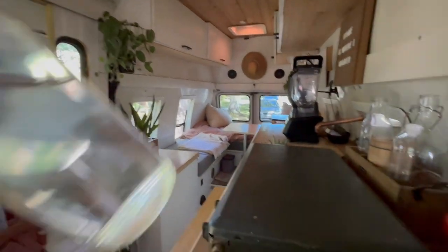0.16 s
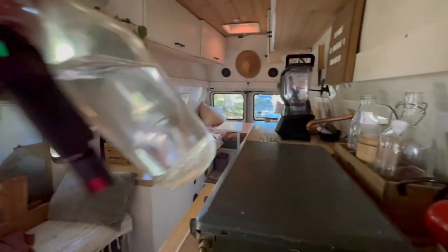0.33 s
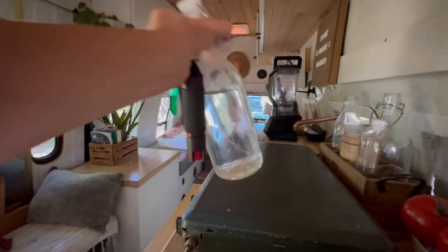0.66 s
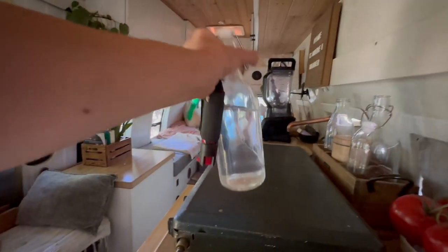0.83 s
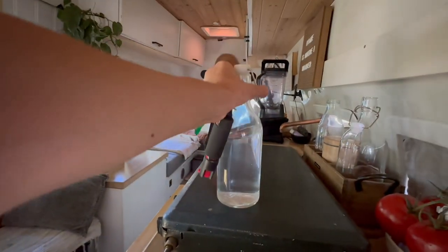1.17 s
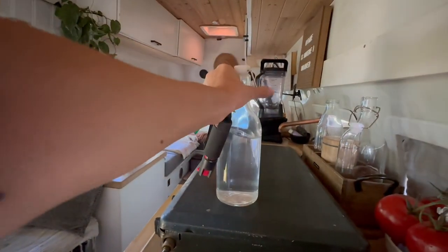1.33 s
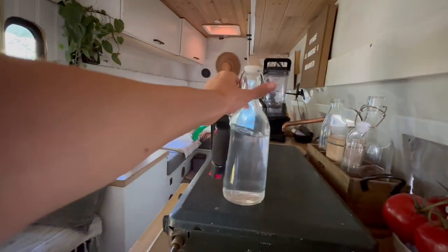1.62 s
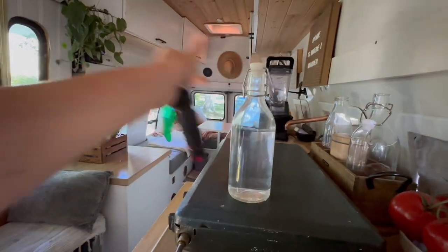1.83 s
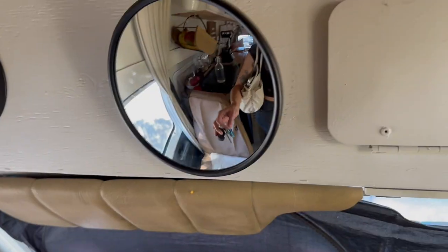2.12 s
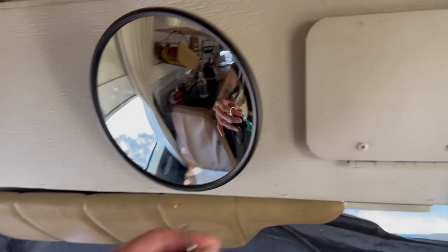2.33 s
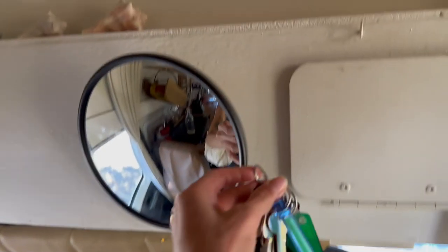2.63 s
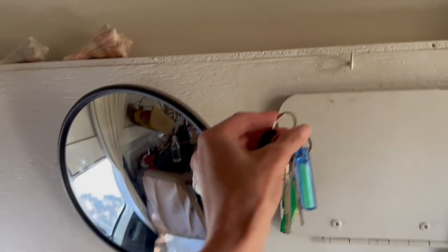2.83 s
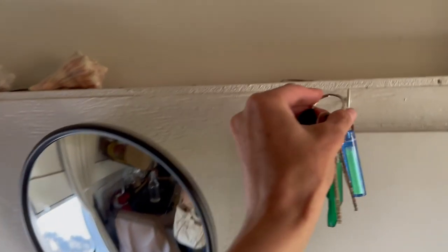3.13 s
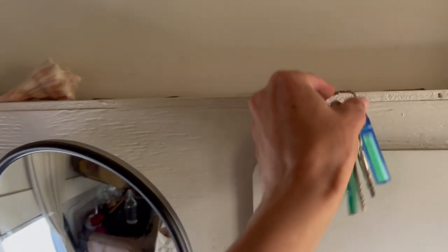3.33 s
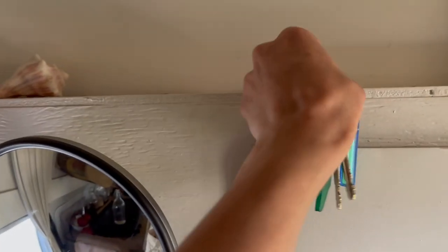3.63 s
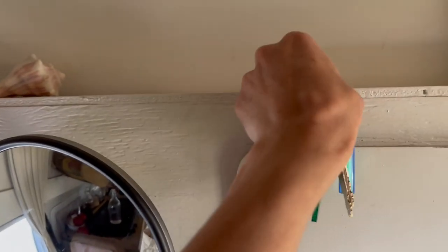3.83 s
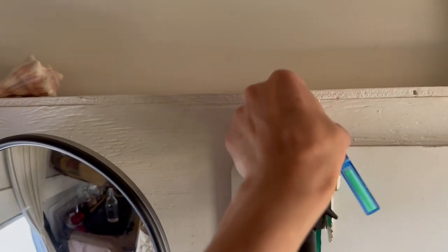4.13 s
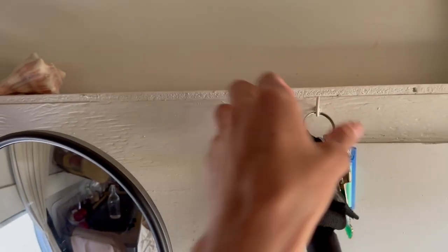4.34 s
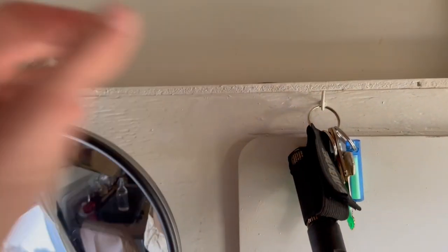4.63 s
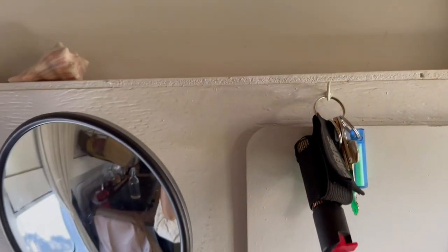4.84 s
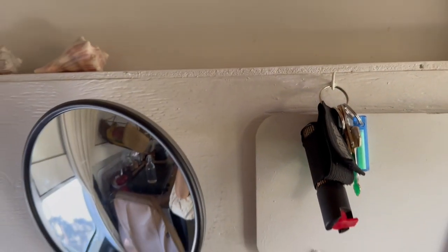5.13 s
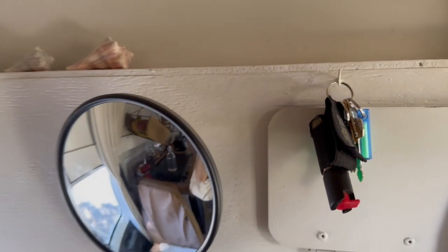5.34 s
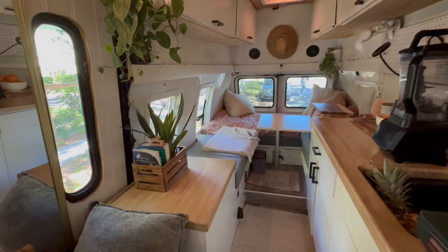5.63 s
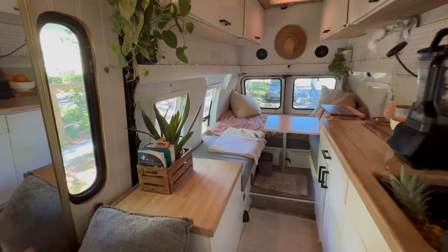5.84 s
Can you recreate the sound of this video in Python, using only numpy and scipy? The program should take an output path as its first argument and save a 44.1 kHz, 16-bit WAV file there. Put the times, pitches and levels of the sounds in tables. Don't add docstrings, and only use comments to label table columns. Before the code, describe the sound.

Inside a small van, a bottle thuds down on wood, keys jingle lightly, rap and scrape at a wall hook, then quiet cabin air.

```python
import sys
import numpy as np
from scipy import signal
from scipy.fft import rfft, irfft, next_fast_len
from scipy.io import wavfile
from scipy.ndimage import uniform_filter1d, map_coordinates

SR = 44100
rng = np.random.default_rng(int(sys.argv[2]) if len(sys.argv) > 2 else 0)


def level_to_linear(level):
    exponent = np.asarray(level, float) / 20
    return 10 ** exponent


def persist_wave(psi):
    counts = np.round(np.clip(psi, -1, 1) * 32767).astype(np.int16)
    wavfile.write(sys.argv[1], SR, np.atleast_2d(counts).T)


N = 263718

# start in seconds, clack in dB, wood and brightness in dB against the clack.
BOTTLE_TOUCHES = [
    (1.046, -26.5, 1.5, -4.5),
    (1.0614, -32.5, 9.9, -45),
    (1.2077, -25.5, 4, 1),
    (1.2294, -33, 8.5, -27),
    (1.3244, -52, 2, -36),
    (1.352, -39, 2, -14),
    (1.361, -43, 2, -10),
    (1.385, -49, 6, -26),
]
# start in seconds, clack in dB, blades and rings in dB against the clack.
AIR_CLINKS = [(1.6735, -49.5, -11, -40), (1.832, -49.5, -9, -25), (1.946, -50, -21, 1),
              (2.029, -56, -4, -9), (2.066, -40, 0, -21), (2.1484, -61.5, 18.5, 23.5),
              (2.1772, -59.5, -2, 15), (2.1944, -65, 6, -3), (2.227, -67, 9, 8), (2.2867, -58, 5, 2),
              (2.3067, -52, 18, 20.5), (2.315, -50.5, -2, 4), (2.456, -55, -30, -31),
              (2.5812, -54, 14.5, 17), (2.6862, -71.5, 18, -11), (2.798, -49.5, 15, 3),
              (2.8677, -70.5, 18, 24), (2.899, -64, 8, 14), (2.934, -57, -0.5, -27), (3.0014, -70, 1, -13),
              (3.03, -65, -10, 10), (3.072, -55, -29.5, -28)]
# start in seconds, clack in dB, wood, blades and rings in dB against the clack.
PANEL_RAPS = [(3.233, -56.5, 11.5, 4, -9), (3.2702, -29, -0.5, 0.5, -7), (3.4226, -48.5, 1.5, -7, -2),
              (3.4743, -37, -2, 2, -1), (3.8792, -43.5, 4, 14.5, 14.5), (3.9178, -36.5, -7.5, 6, 9.5),
              (3.9243, -40.5, -7.5, 5, 16), (3.929, -41, -3, 2.5, 16.5), (3.938, -49, -9, 2.5, 11.5),
              (4.028, -25.5, 7, -20, -15.5), (4.0329, -14, -15.5, -12, -6.5), (4.123, -45.5, -25, 4, 8),
              (4.141, -39.5, -7, -6, -14), (4.147, -42, -5, -3, -14), (4.157, -44, -16.5, -3.5, -3),
              (4.1984, -29, -16, 4.5, -11), (4.241, -22, -8, -3.5, -14.5), (4.252, -28, -10.5, -6.5, -13),
              (4.2604, -31, -7, -13, -14)]
# start in seconds, clack in dB, wood and brightness in dB against it.
FUMBLES = [(3.298, -47.5, -24, -0.5), (3.3184, -54, 5, 6.5), (3.3544, -55.5, 7, 1.5),
           (3.4072, -53.5, -12, 1), (3.469, -48, -10, 2), (3.529, -65, 16, -15), (3.561, -63, -13, 1),
           (3.6127, -59, 2, -14), (3.645, -64, 9, -6), (3.6611, -54, 1, -17), (3.7374, -65, 6, -28),
           (3.871, -44.5, -11.5, 0), (3.897, -53, 12, 2), (3.948, -48, 4, -1.5), (3.962, -52, 8, -4),
           (3.982, -55, 10, -8), (4.012, -54, -6, -20), (4.148, -49, -3.5, -10), (4.186, -41, -7, -11),
           (4.21, -54, -12.5, -2), (4.5327, -72, -3.5, -15.5)]
# start in seconds, clack in dB, wood and brightness in dB against the clack.
DRY_TICKS = [
    (.2512, -39, -6, 3),
    (2.4275, -52, 0, -30),
    (3.8105, -46, -11, -9),
]
RINGS_UNDER_BLADES_DB = {"bottle": -9, "fumble": -5.5, "tick": -8}
RATTLE_LENGTH_S = {"bottle": 0.012, "keys": 0.004, "hook": 0.0063, "fumble": 0.0072, "tick": 0.00066}

# frequency in Hz, level in dB, t60 in seconds.
COUNTER_MODES = [(470, 14, 0.08), (536, 13, 0.21), (786, 18, 0.13), (1033, 15.5, 0.068), (1325, 10, 0.1)]
# frequency in Hz, level in dB, t60 in seconds.
PANEL_MODES = [(485.6, 5, 0.02), (575, 4.5, 0.065), (823, 1.5, 0.0067), (1000, -11, 0.006),
               (1150, -6.5, .03)]
# frequency in Hz, level in dB, t60 in seconds.
SHANK_MODES = [(1900, -4, .005), (2300, 0, .006), (3100, 0, .005), (4100, -3, .004), (5200, -4, .004)]
# frequency in Hz, level in dB, t60 in seconds.
BLADE_MODES = [(6200, -2, .004), (7300, 0, .005), (8300, 0, .005), (9300, -2, .004), (10000, -4, .005)]
# frequency in Hz, level in dB, t60 in seconds.
SPLIT_RING_MODES = [(12600, -3, .005), (13300, 0, .005), (14300, -2, .004), (15200, -1, .006),
                    (15750, 0, .008)]
# frequency in Hz, t60 in seconds.
WALL_DECAY = [(200, 0.15), (2000, 0.11), (8000, 0.1), (16000, 0.063)]
# frequency in Hz, left-right likeness from -1 to 1.
CONTACT_LIKENESS = [(300, 1), (640, 0.5), (1400, 0.044), (3000, 0.1), (7000, 0.096), (15000, .3)]

# start in seconds, peak in dB, frequency in Hz, t60 in seconds.
BOARD_THUDS = [(1.05, -19.5, 255, 0.043), (1.082, -30, 313.3, 0.25), (1.211, -27, 249, 0.12),
               (1.244, -34.5, 315.8, 0.33), (1.361, -33, 271.3, 0.17), (2.193, -46, 340, 0.035),
               (3.224, -51, 323, 0.35), (3.277, -34.5, 374, 0.17), (3.285, -36.5, 97, 0.17),
               (3.299, -38.5, 340, 0.25), (3.482, -35, 103, 0.12), (4.04, -33, 255.5, 0.09),
               (3.352, -37, 279, 0.11), (3.476, -30.5, 320, 0.044), (3.53, -29, 292, 0.033),
               (3.654, -49, 348, 0.17), (3.81, -51.5, 330, 0.22), (3.881, -36, 281.3, 0.22),
               (3.941, -32, 280, 0.09), (4.031, -25.5, 378, 0.079), (4.201, -21.5, 375, 0.03),
               (4.212, -31, 298, 0.047), (4.245, -37.5, 364, 0.15)]
# start in seconds, peak
# in dB, frequency in Hz.
DANGLING_PINGS = [(2.149, -51, 8130), (2.149, -60, 15170), (2.178, -57, 15300), (2.306, -54, 7200),
                  (2.58, -42, 15740), (1.047, -36, 2045), (1.21, -29.5, 2050), (2.31, -54, 14100),
                  (2.798, -55, 7800), (2.798, -51, 13000), (2.798, -52, 10400), (2.9, -66, 12900),
                  (3.423, -61, 15670), (3.88, -43, 1000), (3.88, -38, 15500), (3.94, -43.5, 15200),
                  (4.123, -54.5, 10340), (4.036, -47, 15600)]
# start in seconds, peak in dB, frequency in Hz.
GRIPPED_PINGS = [(2.87, -47, 7900), (3.002, -59, 8150), (3.272, -26, 2400), (3.272, -27.5, 3670),
                 (3.272, -30, 9620), (3.272, -31, 8500), (3.881, -31.5, 7300), (4.123, -43, 2970),
                 (4.241, -37, 9300), (4.198, -39, 9100), (3.476, -35, 2467), (3.477, -33, 866),
                 (3.233, -44, 2550), (3.424, -49, 2450), (3.882, -38.5, 2480), (4.157, -44, 2540),
                 (3.565, -58, 5770), (3.613, -57, 2700), (3.62, -60, 15100), (3.642, -60, 14800),
                 (3.662, -58, 15000), (3.412, -56, 8000), (3.42, -56, 12700), (3.803, -60, 15500),
                 (3.725, -58, 2700), (3.74, -51, 2650), (3.925, -24, 13150), (4.036, -20, 4690),
                 (4.198, -29, 3130), (4.243, -27, 4880)]
# start in seconds, peak in dB, frequency in Hz.
LINGERING_PINGS = [
    (1.062, -34, 500),
    (1.212, -38, 790),
    (1.226, -36, 540),
    (2.799, -50, 15720),
    (2.799, -60, 12650),
    (3.235, -51, 1005),
]

# time in seconds, level
# in dB.
SHAKE_LEVEL = [
    (.252, -62),
    (.272, -54),
    (.32, -57),
    (.35, -63),
               (.595, -69),
    (0.609, -48.5),
    (.7, -55),
    (.8, -50.5),
    (.9, -47.5),
    (1.0, -54),
    (1.04, -74),
]
# frequency in Hz, width in Hz, level in dB.
SHIVER_BODY = [(1080, 470, 7.5), (4940, 220, 2), (5830, 210, 4.5), (14100, 3400, -17)]
# time in seconds, level in dB.
PRESS_LEVEL = [
    (3.2, -73),
    (3.29, -44.5),
    (3.4, -57),
    (3.5, -55),
    (3.6, -56),
    (3.8, -59),
    (4.05, -51.5),
    (4.25, -47),
    (4.42, -60),
]
# frequency in Hz, width in Hz, level in dB.
BOARD_BODY = [(94.5, 30, 3), (237, 110, -2), (340, 110, -1), (520, 200, -8), (950, 120, -14)]
# time in seconds, level in dB.
REACH_LEVEL = [
    (3.0, -72),
    (3.08, -61),
    (3.16, -65),
    (3.24, -54),
    (3.27, -86),
]
# frequency in Hz, width in Hz, level in dB.
KNUCKLE_BODY = [(850, 270, 1), (1270, 530, -2.5)]
# time in seconds, level in dB.
RELEASE_LEVEL = [
    (4.27, -58),
    (4.3, -56),
    (4.35, -55),
    (4.39, -60),
    (4.44, -76),
]
# frequency in Hz, width in Hz, level in dB.
POUCH_BODY = [(595, 350, -4.5), (1400, 540, -6), (2050, 450, -6), (2640, 830, -14.5)]

SCENE_CHANGES_S = [
    2.075,
    5.5809,
]
# rumble, cabin air, rustle, top hiss and hum, all in dB.
SHOT_LEVELS = [
    (-50, -52.5, -69.5, -90, -45.5),
    (-55.5, -70.5, -78, -89, -56.5),
    (-55, -67.5, -78.5, -86.5, -66),
]
# time in seconds, level in dB over rest.
BUSTLE = [(0, 16.5), (.12, 9.5), (.31, 3.5), (.58, 4.5), (.62, 11), (1.03, 11.5), (1.17, 5.5), (1.42, 1),
          (2.07, 1.5), (2.1, 6), (2.83, 0), (3.27, 9.5), (3.44, 2.5), (3.92, 3.5), (4.07, 9), (4.23, 14.5),
          (4.36, 8), (4.47, 1.5)]
AIR_GROWTH = [0.34, 0.65, 1.0]
HISS_GROWTH = [0.88, 0.83, .7]
# frequency in Hz, density in dB per Hz.
COUNTER_RUSTLE = [(880, -11), (1500, -12.5), (2050, -5.5), (3980, -13.5), (5960, -13), (6880, -16),
                  (9710, -18), (11200, -24.5), (14600, -66), (22000, -120)]
# frequency in Hz, density in dB per Hz.
WALL_RUSTLE = [(880, -20.5), (1500, -5.5), (2090, -9), (2300, -4.5), (4930, -10.5), (7340, -16),
               (8140, -13), (10000, -26.5), (13000, -55), (22000, -120)]
# frequency in Hz, density in dB per Hz.
RUMBLE_SPECTRUM = [(12, -55), (20, -12), (53, 8), (107, 0), (134, -2), (157, -1.5), (239, -19.5),
                   (260, -27.5), (340, -66.5), (570, -120)]
# frequency in Hz, density in dB per Hz.
AIR_SPECTRUM = [(110, -37.5), (180, -8), (298, -2), (403, -9), (469, -7), (841, -10), (1280, -9.5),
                (2000, -28.5), (2600, -65), (4400, -120)]
# frequency in Hz, density in dB per Hz.
HISS_SPECTRUM = [(6940, -49.5), (11800, -11), (12600, -6.5), (14200, -8), (15800, -12), (16800, -17.5)]
# frequency in Hz, left-right likeness from -1 to 1.
BACKGROUND_LIKENESS = [(35, 1), (70, 0.87), (180, 0.6), (550, 0.14), (1650, -0.17), (4970, 0.16),
                       (15000, 0.06)]
# lower edge in Hz, upper edge in Hz, gate in dB.
FAINT_BANDS = [(9700, 11500, -95), (12000, 12900, -99), (15100, 17000, -92)]


def bottle_on_counter():
    return contacts(struck(BOTTLE_TOUCHES, "bottle"), COUNTER_MODES, wood_db=-5, pan_db=0.5, wet_db=-7)


def keys_in_air():
    wood_db, length = -9, RATTLE_LENGTH_S["keys"]
    table = [(s, db, wood_db, blades, rings, length) for s, db, blades, rings in AIR_CLINKS]
    return contacts(table, PANEL_MODES, wood_db=2.0, pan_db=1.5, wet_db=-10)


def keys_on_panel():
    table = [(*row, RATTLE_LENGTH_S["hook"]) for row in PANEL_RAPS]
    table += struck(FUMBLES, "fumble") + struck(DRY_TICKS, "tick")
    return contacts(table, PANEL_MODES, wood_db=5.0, pan_db=0.5, wet_db=-7.5)


def struck(table, kind):
    below, length = RINGS_UNDER_BLADES_DB[kind], RATTLE_LENGTH_S[kind]
    return [(s, db, wood, bright, bright + below, length) for s, db, wood, bright in table]


def contacts(table, wood, wood_db, pan_db, wet_db):
    out, t = np.zeros((2, N + SR)), np.arange(SR // 5) / SR
    for s, db, knock, clink, tinkle, length in table:
        rattle = uneven_rattle(t, length)
        hit = ring(rattle, SHANK_MODES, ring_db=2.5)
        hit = hit - level_to_linear(knock) * ring(rattle, wood, wood_db)
        hit = hit - level_to_linear(clink) * ring(rattle, BLADE_MODES, ring_db=-13.5)
        hit = hit + level_to_linear(tinkle) * ring(rattle, SPLIT_RING_MODES, ring_db=-1.5)
        hit = hit * level_to_linear([[pan_db / 2], [-pan_db / 2]])
        out[:, round(s * SR) - 40:][:, :len(t)] += level_to_linear(db - 3.5) * (hit + level_to_linear(wet_db) * walls(hit))
    return out[:, :N]


def uneven_rattle(t, length):
    envelope = (1 - np.exp(-t / 0.0011)) * np.exp(-t / max(length, .001))
    blows = level_to_linear(2.6 * np.minimum(rng.exponential(size=len(t)), 4))
    clumps = level_to_linear(3.5 * np.repeat(rng.standard_normal(len(t) // 60), 60))
    first_touch = 2.03 * np.exp(-t / 0.00033)
    strength = envelope * blows * clumps + first_touch
    return spread(strength * rng.standard_normal((2, len(t))), CONTACT_LIKENESS)


def ring(rattle, body, ring_db):
    lo, hi = body[0][0], body[-1][0]
    modes = [[(c, 2.2 / t60, db + ring_db + rng.normal(0, 2.5))] for c, db, t60 in body]
    broad = [(np.sqrt(lo * hi), 1.58 * (hi - lo), 0)]

    def response(f):
        return resonances(broad, f) ** 2 * (1 + sum(resonances(mode, f) for mode in modes))

    out = filtered(rattle, response)
    return out / np.abs(out.mean(0)).max()


def walls(x):
    hz, t, z = signal.stft(rng.standard_normal((2, SR // 5)), SR, nperseg=128)
    fade = level_to_linear(-60 * t / along(WALL_DECAY, hz)[:, None])
    tail = signal.istft(z * fade, SR, nperseg=128)[1]
    tail = tail / np.linalg.norm(tail[0])
    delayed = np.pad(x, ((0, 0), (90, 0)))
    return signal.fftconvolve(delayed, tail, axes=1)[:, :x.shape[1]]


def ringing_modes():
    pings = [(*row, 0.27) for row in LINGERING_PINGS]
    pings += [(*row, 0.1) for row in DANGLING_PINGS]
    pings += [(*row, 0.03) for row in GRIPPED_PINGS]
    thuds = notes(BOARD_THUDS, rise=.003, rough=.045, wet_db=-12)
    return thuds + notes(pings, rise=.001, rough=.065, wet_db=-12)


def notes(table, rise, rough, wet_db):
    out, t = np.zeros((2, N + SR)), np.arange(SR // 4) / SR
    for s, db, hz, t60 in table:
        waver = rough * np.cumsum(rng.standard_normal((2, len(t))), axis=1)
        phase = 2 * np.pi * hz * t + waver[0] + 0.71 * waver * (hz > 1000)
        tone = level_to_linear(db - 60 * t / t60) * (1 - np.exp(-t / rise)) * np.sin(phase)
        out[:, round(s * SR):][:, :len(t)] += tone + level_to_linear(wet_db) * walls(tone)
    return out[:, :N]


def hand():
    out = scrape(SHAKE_LEVEL, SHIVER_BODY, uneven_db=3, clump_db=3, rate=60)
    out += scrape(PRESS_LEVEL, BOARD_BODY, uneven_db=5, clump_db=3, rate=30).mean(0)
    out += scrape(REACH_LEVEL, KNUCKLE_BODY, uneven_db=6.0, clump_db=1.0, rate=32)
    out += scrape(RELEASE_LEVEL, POUCH_BODY, uneven_db=0.0, clump_db=2.0, rate=44)
    return out


def scrape(curve, modes, uneven_db, clump_db, rate):
    size_db = uneven_db * np.minimum(rng.exponential(size=N), 4)
    touches = rng.standard_normal((2, N)) * level_to_linear(size_db + clump_db * wobble(rate))
    jingle = filtered(touches, lambda f: resonances(modes, f))
    return level_to_linear(curves(curve, -120)[0]) * unit(jingle)


def cabin():
    seconds = np.arange(N) / SR
    shot = np.searchsorted(SCENE_CHANGES_S, seconds)
    rumble_db, air_db, rustle_db, hiss_db, hum_db = np.transpose(SHOT_LEVELS)[:, shot]
    busy, = curves(BUSTLE)
    rumble_db = rumble_db + 0.16 * busy + 1.2 * wobble(4.6)
    air_db = air_db + np.take(AIR_GROWTH, shot) * busy + 0.42 * wobble(7.0)
    air_db = air_db + 3 * (shot == 0) * (seconds - 2)
    hiss_db = hiss_db + np.take(HISS_GROWTH, shot) * busy
    rustle = np.where(shot != 1, rush(COUNTER_RUSTLE, patchy_db=2.5), rush(WALL_RUSTLE, patchy_db=1.0))
    out = level_to_linear(rumble_db) * rush(RUMBLE_SPECTRUM, patchy_db=0.1)
    out += level_to_linear(air_db) * rush(AIR_SPECTRUM, patchy_db=1.5)
    out += level_to_linear(rustle_db + busy) * rustle
    out += level_to_linear(hiss_db) * rush(HISS_SPECTRUM, patchy_db=-2.5)
    return out + fridge_hum(hum_db)


def fridge_hum(level_db):
    phase = 2 * np.pi * np.cumsum(133.9 + 1.2 * wobble(7)) / SR
    return level_to_linear(level_db - 3 + 2 * wobble(9)) * np.sin(phase)


def rush(spectrum, patchy_db):
    z = signal.stft(rng.standard_normal((2, N)), nperseg=512)[2]
    field = uniform_filter1d(rng.standard_normal(z.shape[1:]), 6, 0)
    field = uniform_filter1d(field, 12, 1)
    pair = signal.istft(z * level_to_linear(patchy_db * unit(field)), nperseg=512)[1][:, :N]
    pair = filtered(spread(pair, BACKGROUND_LIKENESS), lambda hz: level_to_linear(along(spectrum, hz)))
    return pair / np.std(pair.mean(0))


def splice():
    level_db, settles_s, swing_hz = -44.5, 0.014, 60
    t = np.arange(N) / SR - SCENE_CHANGES_S[1]
    return -level_to_linear(level_db) * (t >= 0) * np.exp(-np.abs(t) / settles_s) * np.cos(2 * np.pi * swing_hz * t)


def unit(x):
    return x / np.sqrt(np.mean(x ** 2) + 1e-20)


def along(points, hz):
    f, v = np.transpose(points)
    return np.interp(np.log(hz + 1), np.log(f + 1), v)


def curves(rows, outside=None):
    s, *cols = np.transpose(rows)
    return [np.interp(np.arange(N) / SR, s, c, outside, outside) for c in cols]


def wobble(rate):
    knots = rng.standard_normal(int(N * rate / SR) + 4)
    return map_coordinates(knots, [np.arange(N) * rate / SR])


def filtered(x, response):
    n = x.shape[-1]
    m = next_fast_len(n + SR // 16)
    return irfft(rfft(x, m) * response(np.fft.rfftfreq(m, 1 / SR)), m)[..., :n]


def resonances(modes, f):
    total = 0
    for k, (c, w, db) in enumerate(modes):
        total = total + (-1) ** k * level_to_linear(db) * 1j * f * w / (c * c - f * f + 1j * f * w)
    return total


def spread(pair, alike):
    def weights(hz):
        turn = np.arccos(np.clip(along(alike, hz), -1, 1)) / 2
        return np.array([np.cos(turn), np.sin(turn)])

    mid, side = filtered(pair, weights)
    return np.array([mid + side, mid - side])


def scene():
    hits = bottle_on_counter() + keys_in_air() + keys_on_panel()
    return hits + ringing_modes() + hand() + cabin() + splice()


def drop_faint_bands(x):
    for lo, hi, gate_db in FAINT_BANDS:
        edge = filtered(x, lambda hz: (hz > lo) & (hz < hi))
        faint = np.abs(uniform_filter1d(edge ** 2, size=1024)) < level_to_linear(2 * gate_db)
        x = x - edge * uniform_filter1d(1. * faint, size=256)
    return x


def sudden_attacks(x):
    power = np.abs(uniform_filter1d(np.diff(x.mean(0), prepend=0) ** 2, size=128))
    before = np.roll(uniform_filter1d(power, size=512), shift=384)
    opened = uniform_filter1d(1. * (power > level_to_linear(2 * 6) * before), size=round(.003 * SR))
    return np.clip(3 * opened, 0, 1)


def masked(x):
    hz, _, z = signal.stft(x, SR, nperseg=512)
    power = np.mean(np.abs(z[:, :256]) ** 2, axis=0)
    power = power.reshape(32, 8, -1).mean(axis=1)
    keep = power > level_to_linear(2 * -30) * power[3:].max(axis=0)
    keep = np.repeat(keep, 8, axis=0) | (hz[:256, None] < 9600)
    return signal.istft(z * np.pad(keep, ((0, 1), (0, 0))), SR, nperseg=512)[1][:, :N]


def low_pass(x):
    return signal.sosfilt(signal.butter(12, 16960, fs=SR, output="sos"), x)


def record(dry):
    gap = [(10600, 0), (10950, -34.5), (12250, -40.0), (12600, -0.5)]  # (Hz, dB)
    top = [(15800, 0), (16100, -19.5), (16900, -31.0), (17500, -59.5)]  # (Hz, dB)
    full = filtered(dry, lambda hz: level_to_linear(along(top, hz)))
    hollow = drop_faint_bands(filtered(full, lambda hz: level_to_linear(along(gap, hz))))
    heard = hollow + level_to_linear(-10) * sudden_attacks(full) * (full - hollow)
    return low_pass(masked(heard))


dry = scene()
out = record(dry)
persist_wave(out)
```